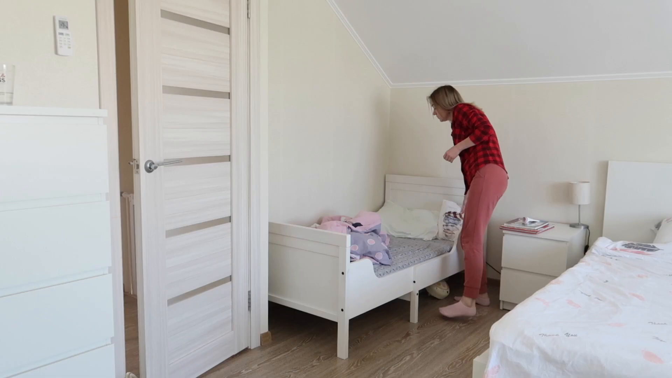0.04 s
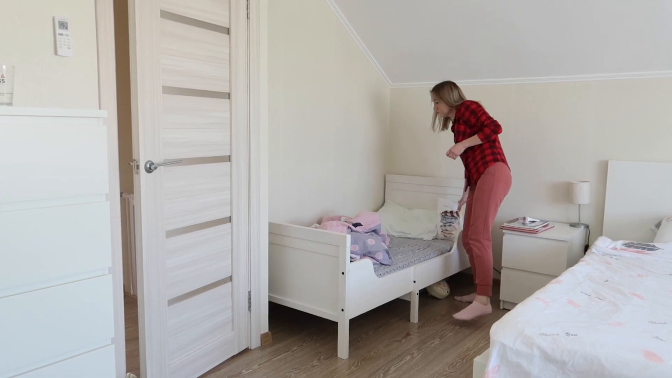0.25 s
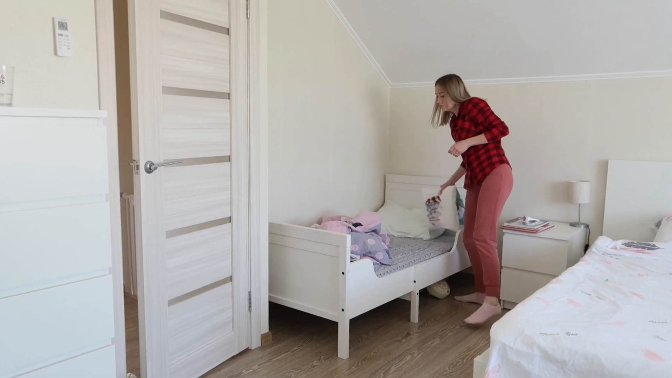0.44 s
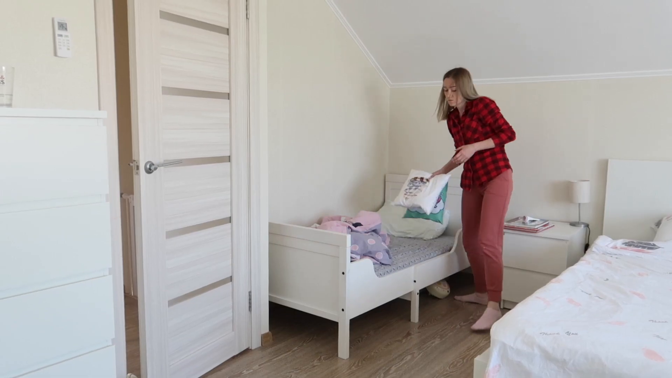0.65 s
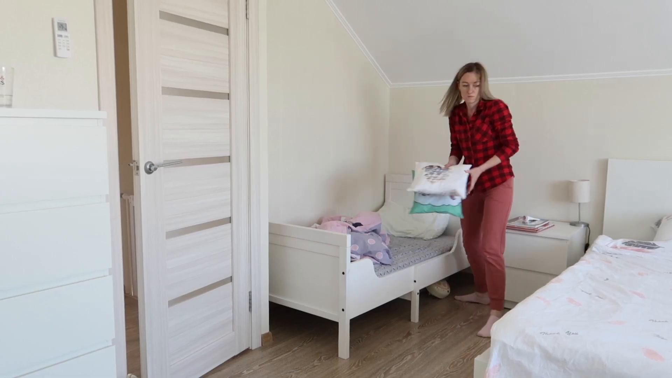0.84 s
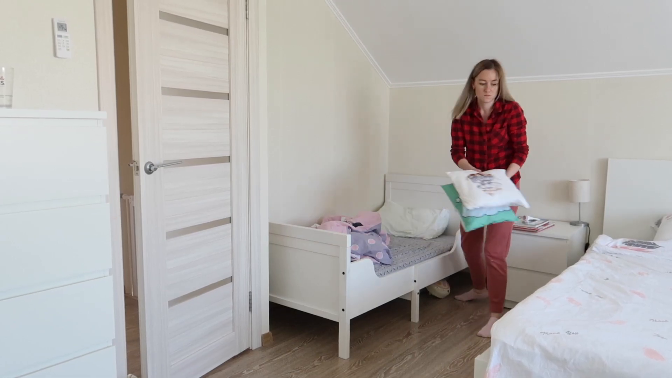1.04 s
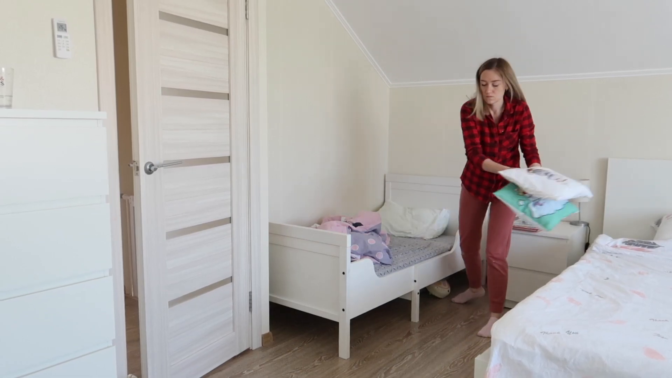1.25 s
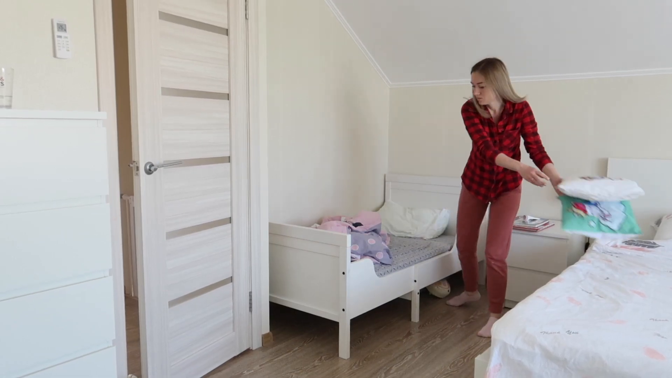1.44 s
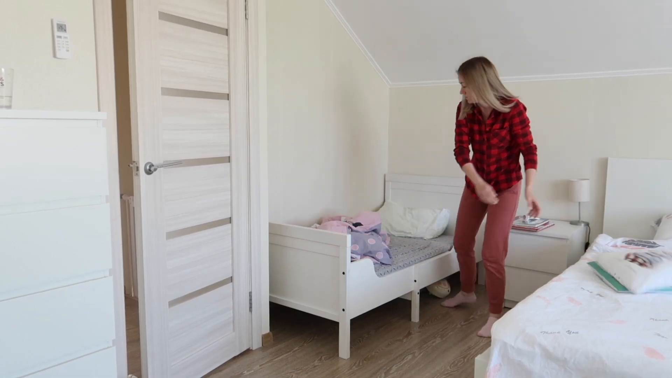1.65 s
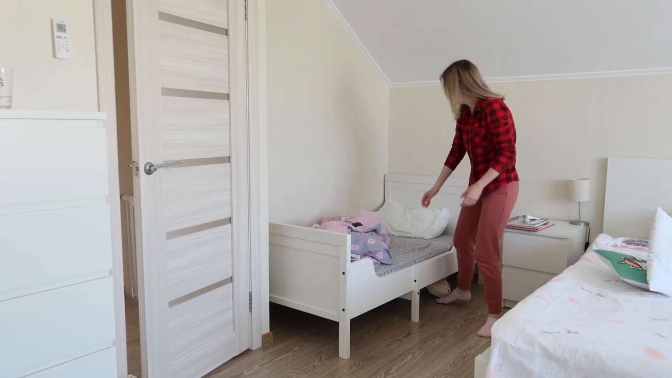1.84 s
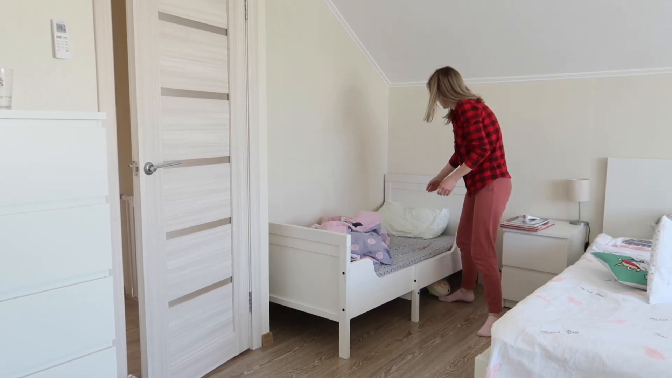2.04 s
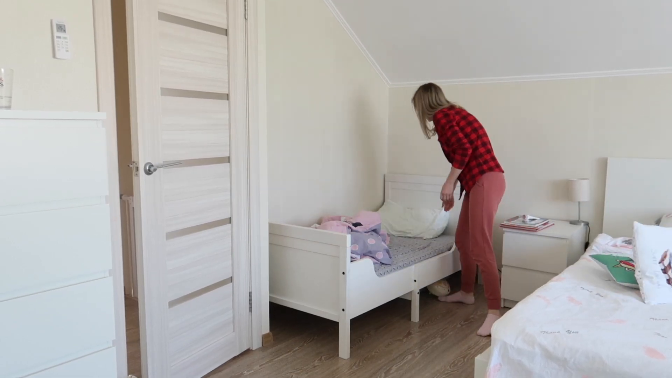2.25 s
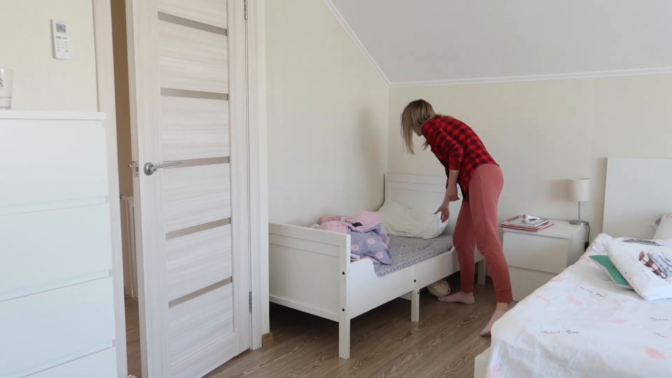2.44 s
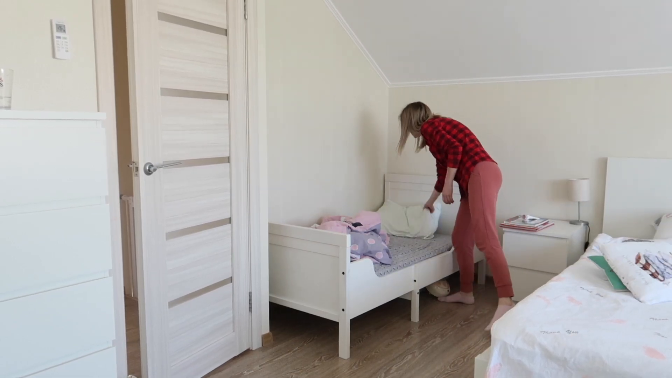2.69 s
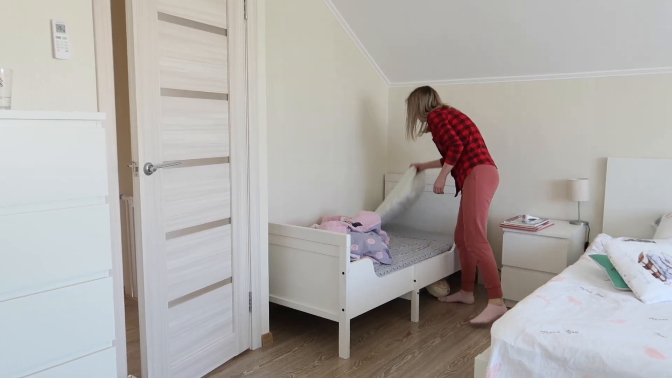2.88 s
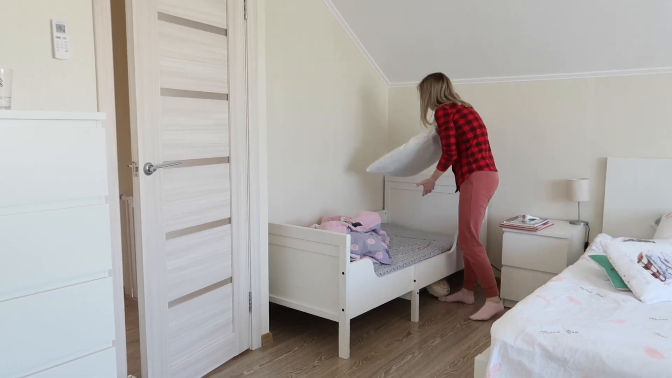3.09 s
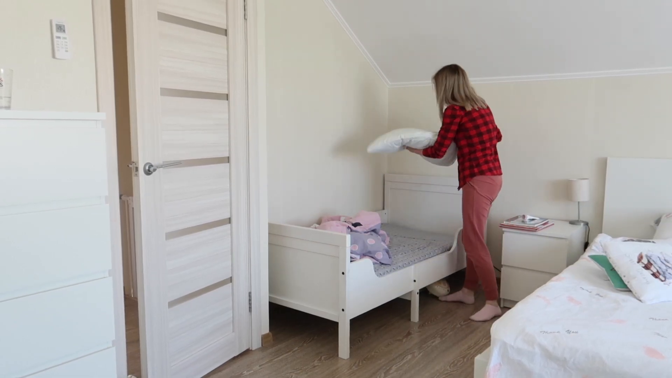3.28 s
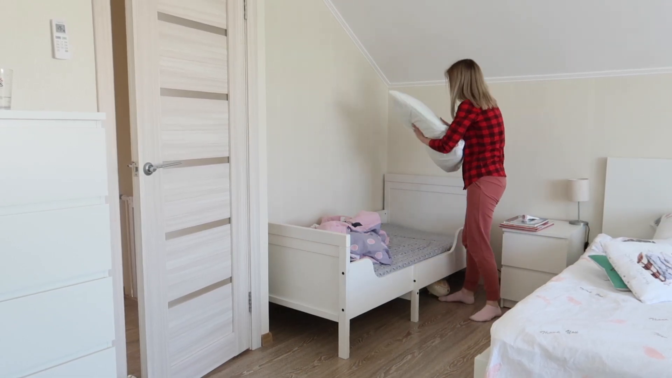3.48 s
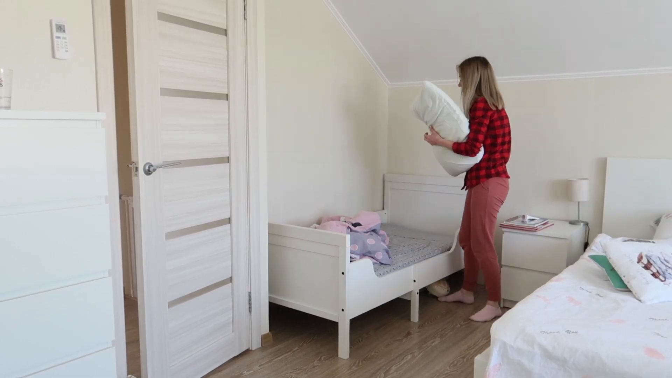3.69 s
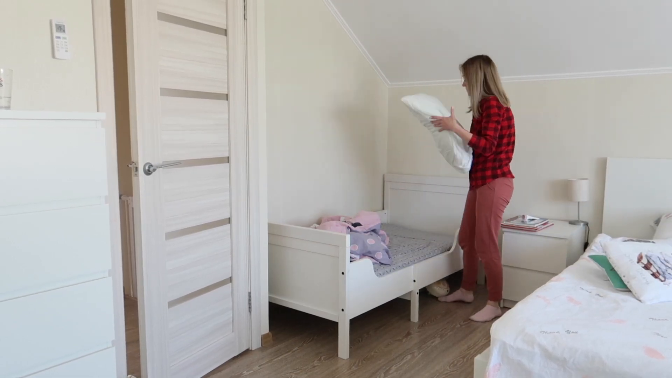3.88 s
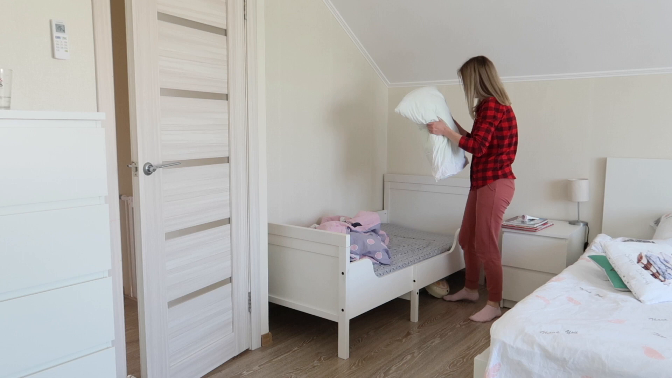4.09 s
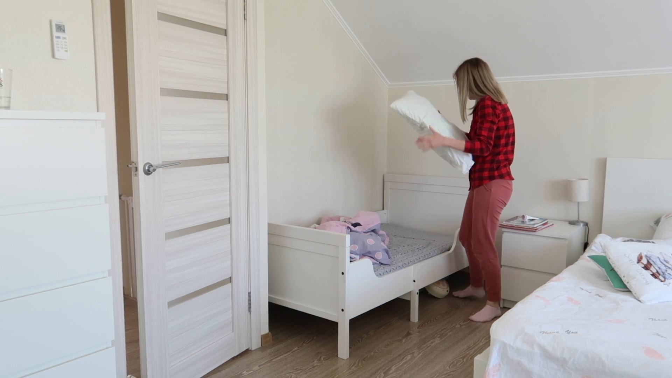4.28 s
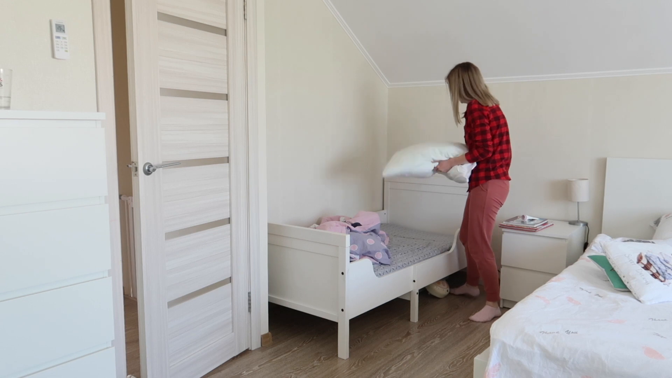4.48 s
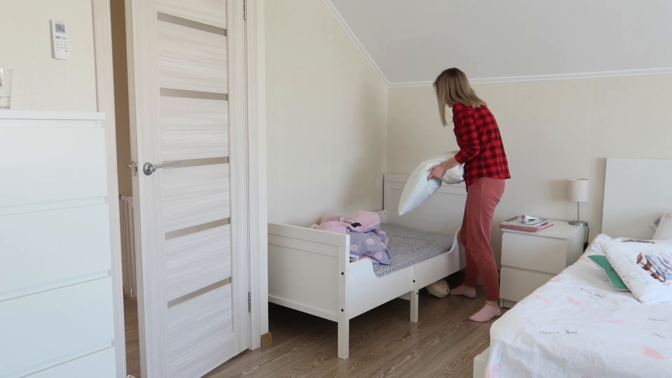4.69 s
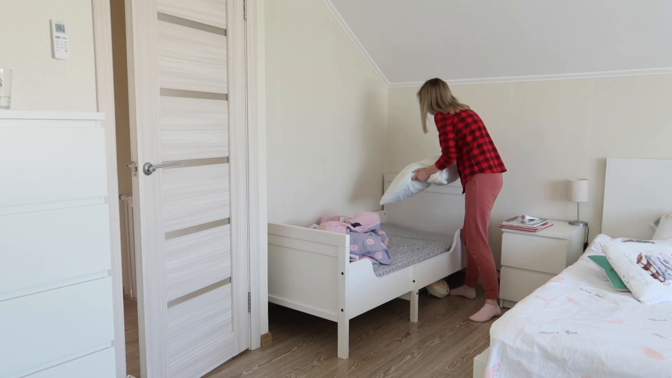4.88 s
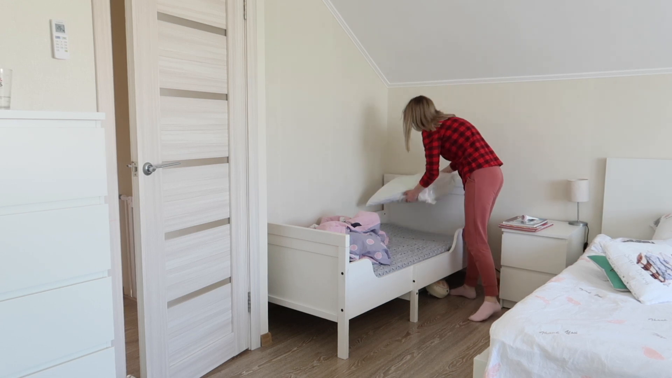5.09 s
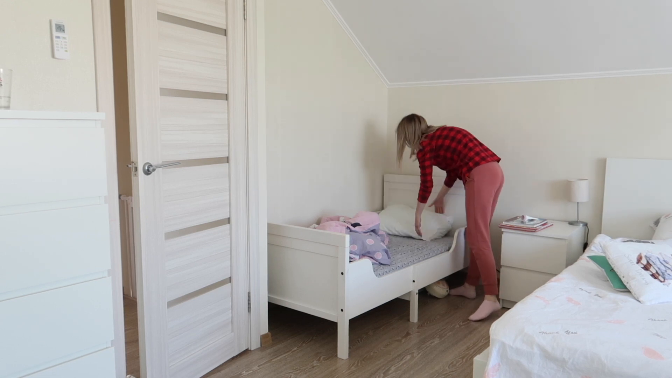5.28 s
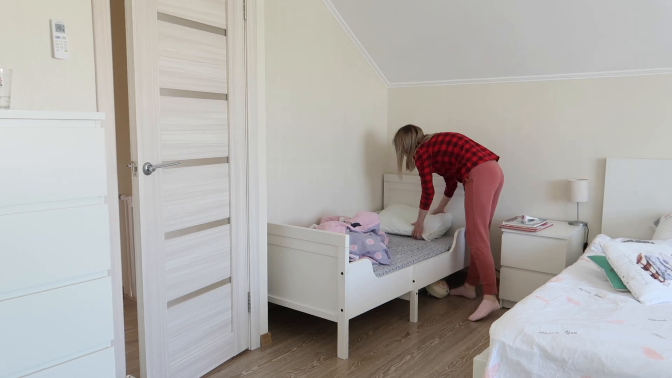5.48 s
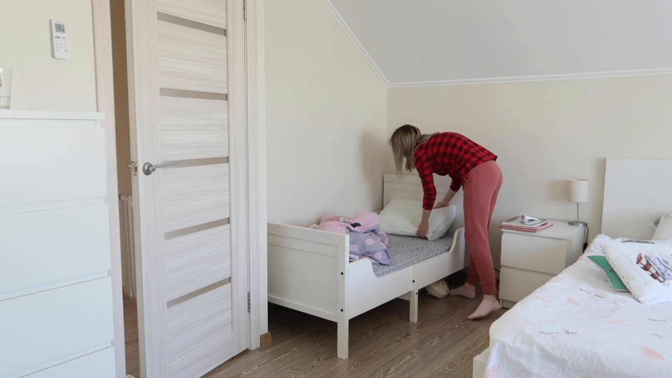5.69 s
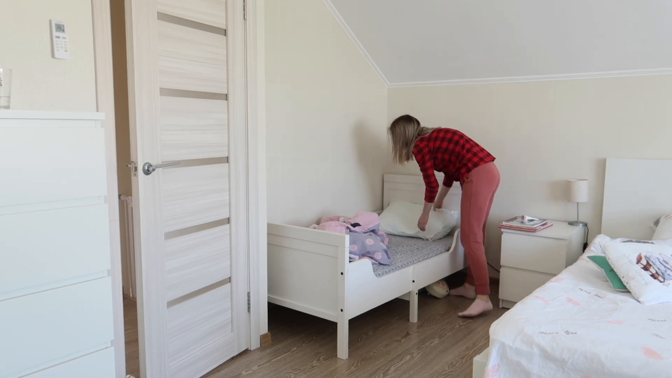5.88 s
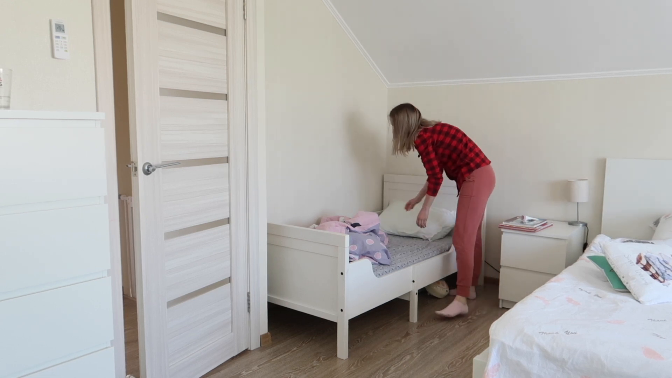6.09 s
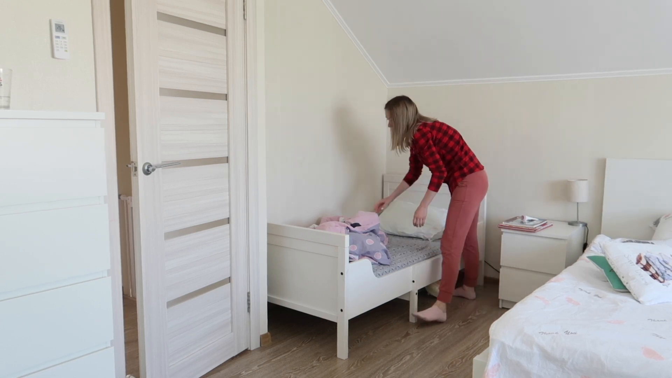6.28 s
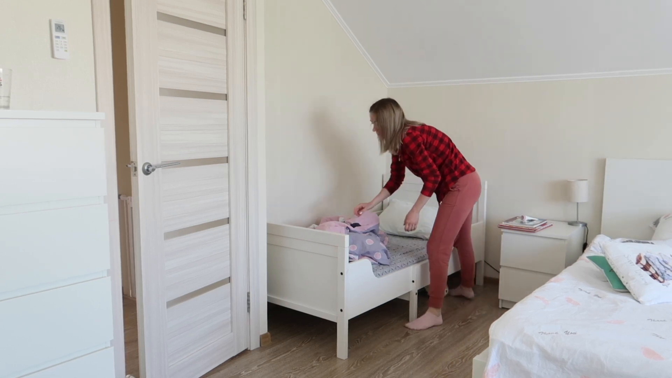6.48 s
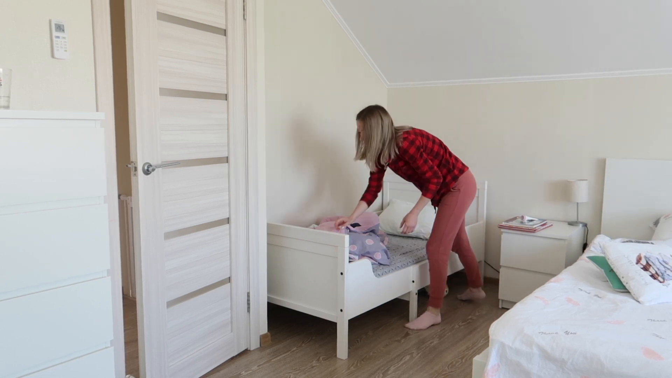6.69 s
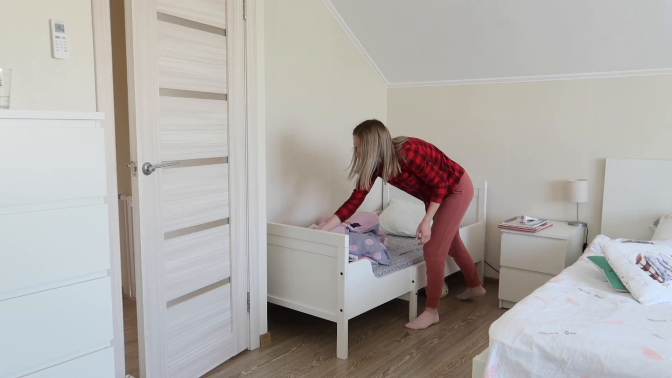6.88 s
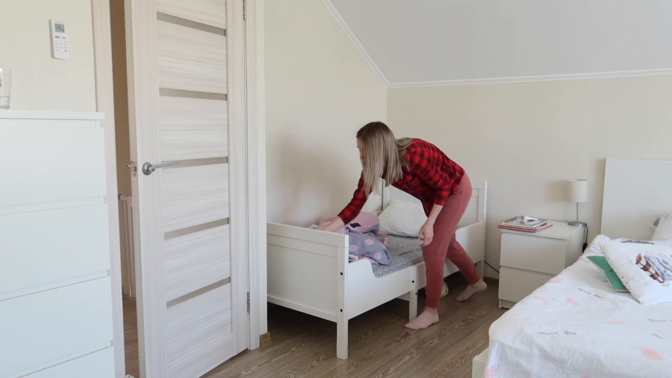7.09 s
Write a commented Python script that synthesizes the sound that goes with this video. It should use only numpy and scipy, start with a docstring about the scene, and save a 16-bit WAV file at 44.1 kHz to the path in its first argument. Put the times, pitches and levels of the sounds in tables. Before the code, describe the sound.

A small, quiet bedroom with steady soft air hush, a barely audible wavering low drone and short natural reverberation, heard from a few metres away. From 0 to 0.6 s a hand sweeps briskly over a duvet, a bright swish with small pats, cutting off abruptly. Faint sleeve and cushion rustles and soft barefoot steps follow around 0.7-1.5 s. At 1.65-1.75 s cushions flop onto a bed with clustered padded thumps and hollow knocks. It is nearly still until a pillow is grabbed at 2.7 s with a dry rustle and pat. Firm dull slaps come at 3.25 and 3.6 s, with rubbing between and after; another pat and rustle at 4.45 s. At 5.25-5.35 s the pillow drops, with bright ticks, a brief wooden frame clap and the deepest, loudest thud. Smoothing rustles fade by 6 s. Bare footsteps thump softly at 6.4-6.65 s, with light cloth rubbing to 7 s.

```python
"""Small, quiet bedroom: someone makes up beds under steady air hush and a faint wavering drone.
A duvet is smoothed, cushions are tossed onto a bed, a pillow is picked up, patted and dropped in place.
Cloth is shaped friction noise; pats and ticks are band-shaped bursts; frame claps are ringing panels.
Thuds, knocks and bare feet are damped modes. Reflections, resonances and a diffuse field make the room."""
import sys
import numpy as np
from scipy import signal
from scipy.fft import rfft, irfft, next_fast_len
from scipy.io import wavfile
from scipy.ndimage import uniform_filter1d

SR = 44100
rng = np.random.default_rng(int(sys.argv[2]) if len(sys.argv) > 2 else 0)


def put_to_file(sound):
    """Save the sound as 16-bit audio at rate SR, in the file named by the first command-line argument."""
    columns = np.atleast_2d(sound).T  # one column per channel
    safe = np.clip(columns, -1, 1)
    whole_steps = np.round(safe * 32767)
    wavfile.write(sys.argv[1], SR, whole_steps.astype(np.int16))


N = 314962
TIME_S = np.arange(N) / SR
BANDS_HZ = 44 * 2. ** (np.arange(18) / 2)  # half-octave centres

# Levels are relative, ahead of the mix gains in scene().
# still room spectrum: hz, level_db
AIR_COLOUR = [(12, -39), (20, -10), (41, 1), (72, -11.5), (108, 0), (174, -9.5), (263, -15), (377, -11),
              (540, -16), (796, -16), (889, -19), (1240, -20.5), (1990, -23), (9370, -38), (15000, -48.5)]
# stereo spread of the hush: hz, side_minus_mid_db
AIR_WIDTH = [(60, -22), (110, -24), (200, -0.5), (380, -0.5), (1300, -0.5), (4400, 2), (15000, 0.5)]
# faint drone in the house: hz, level_db
HUM = [(102, -68), (199, -65), (264, -65), (888, -71)]
AIR_DB = -53

# hand sweeping over the duvet: time_s, speed_db
SWEEP_SPEED = [(0.0, -10), (0.06, -16), (0.1, -7), (0.25, 0), (0.485, -1), (0.52, -10), (0.6, -55)]
# sweep, through the padding: hz, density_db_per_hz
SWEEP_RUB = [(50, -33), (90, 3), (140, 3.5), (250, -3), (370, -13.5), (520, -4), (800, -14), (1300, -6.5),
             (2400, -15.5), (3600, -12.5), (6000, -54)]
# sweep, off the weave: hz, density_db_per_hz
SWEEP_HISS = [(1180, -31), (2000, -12), (2410, -1), (2800, -12), (5140, -2.5), (7260, -7.5), (12000, -21),
              (15000, -58)]
SWEEP_RUB_DB, SWEEP_HISS_DB = -42, -43.5  # at full speed
RUB_SPEED_EXPONENT = 0.17  # hiss: 1

# pillow or sleeve sliding over cloth: start_s, length_s, fastest_at_share_of_length, rub_db, hiss_db
STROKES = [ (0.656, 0.31, 0.4, -60, -68), (0.882, 0.084, .5, -51.5, -55), (0.959, 0.14, 0.34, -49, -55.5),
           (1.072, 0.36, 0.37, -54.5, -61.5), (1.323, 0.22, 0.53, -49, -53),
           (2.164, 0.74, 0.19, -57.5, -74), (2.647, 0.16, .42, -42.5, -50.5),
           (2.78, 0.12, 0.46, -44.5, -51), (2.871, 0.19, 0.15, -47.5, -57), (3.155, 0.39, 0.23, -48, -57.5),
           (3.694, 0.23, 0.15, -47, -61.5), (3.865, 0.37, 0.16, -47.5, -62.5),
           (4.194, 0.18, 0.26, -46.5, -56.5), (4.42, 0.079, 0.48, -39, -55), (4.524, 0.15, 0.52, -44, -55),
           (5.17, 0.36, 0.34, -45, -51), (5.499, 0.25, 0.24, -43.5, -60), (5.72, 0.27, 0.26, -61, -57),
           (6.526, 0.1, 0.41, -55, -64), (6.607, 0.19, 0.44, -50, -56), (6.964, 0.062, .25, -48.5, -64), ]
# handling, through the padding: hz, density_db_per_hz
HANDLING_RUB = [(60, 11), (130, 10.5), (260, 11), (450, 3.5), (800, 1.5), (1400, -3), (2400, -15),
                (4000, -60)]
# handling, off the weave: hz, density_db_per_hz
HANDLING_HISS = [(1200, -6.5), (2600, 0), (5000, -5), (7000, -12.5), (10000, -20), (15000, -38)]
CLOTHES_RUB_DB, CLOTHES_HISS_DB = -73, -63
CLOTHES_SWING_DB, CLOTHES_PER_S = 0.5, 0.36  # rms swing, drift rate
STROKE_EXPONENT = 1.28  # shapes the ease in and out of strokes and scrapes

# soft blows on pillows and bedding: start_s, level_db, peak_s, dull_above_hz, hollow_ring_hz
PATS = [ (0.000, -33, 0.0029, 607, 337), (0.117, -37.5, 0.015, 2000, 520), (0.275, -36, 0.016, 1127, 176),
        (0.511, -37.5, 0.0071, 1496, 666), (0.842, -36.5, 0.011, 302, 204),
        (1.6373, -31, 0.0064, 900, 1000), (1.654, -28, 0.016, 960, 435), (1.685, -23.5, 0.021, 770, 467),
        (1.761, -33, 0.0079, 500, 260), (2.7183, -25.5, 0.0035, 858, 1227), (2.925, -40, 0.006, 261, 160),
        (3.2427, -15, 0.0067, 1150, 645), (3.606, -19, 0.0082, 2050, 636), (3.917, -36.5, 0.0066, 610, 267),
        (4.009, -45, 0.028, 850, 294), (4.455, -30, 0.016, 1620, 445), (5.292, -42.5, 0.013, 1515, 400),
        (5.333, -24, 0.0092, 630, 333), (5.573, -41, 0.0091, 1010, 350), (5.836, -40, 0.0093, 590, 235.4),
        (6.424, -43, 0.016, 1500, 607), (6.979, -46, 0.0063, 900, 520), ]
# padding spectrum: hz, density_db_per_hz
PADDING = [(60, 28), (200, 13.5), (450, 7.5), (800, 3.5), (1500, 1.5), (2600, -2.5), (4200, -7),
           (6000, -13), (9000, -25.5), (15000, -36)]
THIN_HZ, PAT_HZ = 230, 1010  # dull above PAT_HZ: thin below THIN_HZ; both scale together
SETTLE_DELAY_S, SETTLE_DB, SETTLE_PEAK_S = 0.017, -6.5, 0.0075  # dB relative to the blow
SETTLE_DULL_HZ, SETTLE_THIN_HZ, SETTLE_RING_HZ = 600, 130, 240

# scrapes of taut cloth and scuffs of feet: start_s, length_s, level_db, lower_hz, upper_hz, width_octaves
SCRAPES = [ (0.000, 0.09, -49, 2550, 3870, 0.4), (0.145, 0.049, -38.5, 1080, 1370, 0.11),
           (0.173, 0.15, -50, 2320, 2470, 0.2), (0.512, 0.031, -47, 670, 1353, 0.48),
           (2.715, 0.067, -54, 785, 1250, 0.18), (4.23, 0.075, -60, 3000, 5200, 0.38),
           (4.437, 0.063, -51, 1390, 2097, 0.5), (5.223, 0.2, -64, 3545, 4870, 0.18),
           (5.74, 0.29, -64, 3550, 5230, 0.24), (6.54, 0.1, -56, 2850, 4020, 0.21),
           (6.628, 0.075, -53, 2700, 3880, 0.37), (6.675, 0.09, -59, 2800, 3800, 0.25),
           (6.964, 0.073, -55.5, 1410, 2160, 0.36), ]
SCRAPE_FASTEST = 0.16  # share of length

# muffled, hollow knocks of bedding, furniture and floor: start_s, level_db, pitch_hz
KNOCKS = [(0.153, -32, 488), (1.638, -30.5, 451), (1.689, -22, 506), (1.693, -25.5, 416),
          (1.712, -24, 204.6), (1.764, -44, 195), (1.817, -42, 405), (2.717, -31.5, 230),
          (2.727, -30.5, 426), (3.256, -33, 244), (3.612, -31, 680), (3.621, -27.5, 260), (3.653, -27, 256),
          (4.469, -31.5, 253), (4.497, -36, 251), (6.458, -41, 179)]
# knock modes: pitch_multiple, level_db, cycles_to_minus_60_db
HOLLOW_MODES = [(1, -0.5, 40), (2.2, -17.5, 110), (2.78, -15.5, 114)]
KNOCK_SWELL_CYCLES = 1.64

# low thuds, weight landing on pillow, mattress or floor: start_s, level_db, pitch_hz, damping_multiple
THUDS = [(0.267, -33.5, 130, 1), (0.847, -43, 131, 1.2), (1.686, -26, 88.4, .7), (1.711, -33, 93.4, 1.2),
         (2.902, -38, 135, 0.81), (2.931, -35.5, 132.6, 0.7), (3.244, -16.5, 94.3, 1.8),
         (3.615, -30, 147, .9), (4.464, -36, 89.5, 0.83), (4.47, -33, 124, 0.67), (5.317, -21.5, 128, 0.78),
         (5.3306, -9.5, 100.4, 2), (5.367, -24, 129, 0.49), (5.515, -32, 127, 1.8),
         (5.644, -34.5, 122, 1.8), (6.421, -23.5, 94, 1.55), (6.456, -34, 92, 0.85)]
# thud modes: pitch_multiple, level_db, cycles_to_minus_60_db (at damping 1)
THUD_MODES = [(.44, -20, 31.5), (1, -1, 12.5), (1.3, -26, 55), (2.5, -24, 54)]
THUD_SWELL_S = 0.0071

# short bright ticks, from creases, a pillow striking wood or a foot coming unstuck:
# start_s, level_db, peak_s, thin_below_hz, dull_above_hz, ring_hz
TICKS = [ (0.514, -43, 0.007, 700, 2400, 1500), (0.584, -45.5, 0.0069, 3560, 11000, 8000),
         (1.645, -40, 0.016, 950, 3170, 2210), (1.685, -35, 0.018, 893, 5000, 2300),
         (2.192, -47, 0.0093, 1210, 4970, 3260), (2.72, -39, 0.003, 1100, 4500, 3400),
         (3.245, -37.5, 0.0057, 1800, 4000, 2610), (3.272, -40, 0.018, 999, 3500, 2400),
         (5.192, -41.5, 0.0086, 1700, 5500, 3100), (5.2375, -30.5, 0.0061, 840, 5200, 4670),
         (5.3331, -24, 0.0033, 1390, 6950, 4550), (5.368, -43, 0.0048, 2500, 8000, 5000),
         (6.41, -34, 0.0079, 3800, 7600, 4100), (6.964, -43.5, 0.0045, 1300, 3250, 2840), ]

# bare feet on the floor: start_s, level_db, boards_pitch_hz, swell_s, softness_db_per_octave
FOOTFALLS = [(0.985, -36.5, 27, 0.013, 24), (1.065, -39.5, 26.8, 0.0092, 19), (2.226, -44, 41.6, 0.016, 15),
             (4.713, -47.5, 49, 0.0097, 14), (6.409, -24.5, 31.8, 0.003, 16),
             (6.491, -28, 34.3, 0.0072, 11), (6.64, -42.5, 44.6, 0.0081, 13)]
# floor modes: pitch_multiple, level_db, cycles_to_minus_60_db
FLOOR_MODES = [(1, 1.5, 11.5), (1.78, 3, 26), (2.97, 0, 39), (5.6, -8, 63)]

# pillow and hands against the bed frame: start_s, level_db, rise_s
CLAPS = [(5.239, -28.5, .006), (5.334, -28.5, 0.0036)]
# bed frame panels: hz, level_db, t60_s
FRAME_PANELS = [(522, 2.5, 0.18), (652, 3, 0.16), (1200, -1, 0.21), (1690, -4, .1), (2210, -1, .09),
                (2490, -3, 0.072), (2840, -3, .12), (3650, -2, 0.11), (4810, 0.5, 0.086)]

# low standing waves stirred by every thud: hz, width_hz, level_db
BOOM = [(37.98, 5.5, -11), (95.6, 8.2, -6), (263, 7.3, -12)]
# room and furniture resonances: hz, width_hz, level_db
RESONANCES = [(194, 7.2, -11), (235, 16, -9), (264, 29, -5.5), (414, 21, -1), (496.5, 10.8, 2),
              (651, 14, -3.5), (700.7, 16, 5), (746, 13, -11), (845, 27, -0.5), (928, 17, -4.5),
              (1120, 16, -23), (1316, 30, -16), (1490, 15, -12), (1976, 41, -12), (2200, 60, -9.5),
              (2620, 110, -16), (3540, 95, -22), (5040, 88, -15), (5290, 90, -12)]
# first reflections off floor, walls and sloping ceiling: delay_s, level_db
REFLECTIONS = [(.0029, -26), (.0067, -20), (0.012, -17.5), (0.016, -20.5), (0.025, -14.5), (0.033, -14),
               (0.0454, -22.5)]
# small things throw back mostly treble: hz, level_db
CLUTTER = [(200, -18), (900, -1.5), (2500, -2), (12000, -3.5)]
# reverberation: hz, t60_s
ROOM_DECAY = [(80, 0.28), (250, 0.43), (600, 0.5), (1500, 0.48), (4000, 0.41), (12000, 0.21)]
# colour of the diffuse side signal: hz, gain_db
SIDE_WIDTH = [(60, -50), (130, -67), (300, -25.5), (1000, -23), (2300, -21), (4400, -11), (8000, -4.5),
              (15000, 1)]
EDGE_HZ = 15100


def amp(db):
    """Decibels to gain."""
    return 10 ** (np.asarray(db) / 20)


def unit(x):
    """Scales to rms 1."""
    return x / np.sqrt(np.mean(x ** 2) + 1e-20)


def read(points, hz):
    """Reads a table on a log-frequency axis."""
    f, value = np.transpose(points)
    return np.interp(np.log(hz + 1), np.log(f + 1), value)


def add(mix, start_s, sound):
    """Mixes a sound in at start_s."""
    part = mix[max(round(start_s * SR), 0):][:len(sound)]
    part += sound[:len(part)]


def colour(x, points):
    """Filters by a (hz, db) table."""
    size = next_fast_len(len(x), True)
    gain = amp(read(points, np.fft.rfftfreq(size, 1 / SR)))
    return irfft(rfft(x, size) * gain, size)[:len(x)]


def wander(per_s):
    """Smooth random drift of rms 1."""
    size = next_fast_len(N, True)
    hz = np.fft.rfftfreq(size, 1 / SR)
    spectrum = rfft(rng.standard_normal(size)) / (1 + (hz / per_s) ** 4)
    return unit(irfft(spectrum, size)[:N])


def band(x, hz, octaves=0.49):
    """Band-pass centred on hz."""
    edges_hz = hz * 2. ** (octaves * np.array([-.5, .5]))
    return signal.sosfilt(signal.butter(2, edges_hz, "bandpass", fs=SR, output="sos"), x)


def pair(mid, side):
    """Left and right from middle and side."""
    return np.array([mid + side, mid - side])


def air():
    """Steady coloured-noise hush; drone tones waver through random quadrature amplitudes."""
    mid, side = (unit(colour(rng.standard_normal(N), AIR_COLOUR)) for _ in range(2))
    hum = np.zeros(N)
    for hz, db in HUM:
        phase = 2 * np.pi * hz * TIME_S
        hum += amp(db) * unit(wander(5.3) * np.cos(phase) + wander(8.7) * np.sin(phase))
    return amp(AIR_DB) * pair(mid, colour(side, AIR_WIDTH)) + hum


def friction(slips_per_s, spread_db, grainy, uneven_db):
    """Countless small slips as noise, with sparse snaps and an uneven level."""
    sign = np.sign(rng.standard_normal(N))
    size = amp(spread_db * np.minimum(rng.exponential(1, N), 4))
    snaps = sign * size * (rng.random(N) < slips_per_s / SR)
    fibres = rng.standard_normal(N)
    return unit((fibres + grainy * unit(snaps)) * amp(uneven_db * wander(23.5)))


def rustle(rub_level, hiss_level, drive, rub_colour, hiss_colour):
    """Friction sounds twice: muffled through the padding, bright off the weave."""
    rub = rub_level * unit(colour(drive, rub_colour))
    hiss = hiss_level * unit(colour(drive, hiss_colour))
    return rub + hiss


def sweep():
    """Hand on the duvet: hiss follows speed more than rub does, so faster is brighter."""
    time_s, speed_db = np.transpose(SWEEP_SPEED)
    speed = amp(np.interp(TIME_S, time_s, speed_db)) * (TIME_S < time_s[-1])
    rub_level = amp(SWEEP_RUB_DB) * speed ** RUB_SPEED_EXPONENT
    hiss_level = amp(SWEEP_HISS_DB) * speed
    drive = friction(slips_per_s=1300, spread_db=3.0, grainy=0.74, uneven_db=1.1)
    return rustle(rub_level, hiss_level, drive, SWEEP_RUB, SWEEP_HISS)


def arch(length_s, fastest):
    """Speed of one stroke, from rest to rest."""
    share = np.arange(0, length_s, 1 / SR) / length_s
    progress = np.interp(share, [0, np.clip(fastest, .05, .95), 1], [0, .5, 1])
    return abs(np.sin(np.pi * progress)) ** STROKE_EXPONENT


def handling():
    """Pillows and sleeves rub cloth, one arch a stroke, over the constant faint stir of clothes."""
    stir = amp(CLOTHES_SWING_DB * wander(CLOTHES_PER_S))
    rub_level, hiss_level = amp(CLOTHES_RUB_DB) * stir, amp(CLOTHES_HISS_DB) * stir
    for start_s, length_s, fastest, rub_db, hiss_db in STROKES:
        speed = arch(length_s, fastest)
        add(rub_level, start_s, amp(rub_db) * speed)
        add(hiss_level, start_s, amp(hiss_db) * speed)
    drive = friction(slips_per_s=1300, spread_db=3.5, grainy=0.69, uneven_db=2.0)
    return rustle(rub_level, hiss_level, drive, HANDLING_RUB, HANDLING_HISS)


def shares(size):
    """Overlapping weights that split a spectrum into half octaves."""
    hz = np.fft.rfftfreq(size, 1 / SR)
    return np.clip(1 - 2 * abs(np.log2((hz + 1) / BANDS_HZ[:, None])), 0, 1)


def puff(peak_s, dull_hz, thin_hz, ring_hz, hollow_db=4.5):
    """Contact over a few milliseconds: a noise burst shaped in half octaves, with a hollow ring."""
    t = np.arange(6000) / SR
    contact = (t / peak_s * np.exp(1 - t / peak_s)) ** 2
    hollow = hollow_db * np.exp(-(np.log2(BANDS_HZ / ring_hz) / 0.22) ** 2)
    power = BANDS_HZ * amp(read(PADDING, BANDS_HZ) + hollow) ** 2
    power = power / (1 + (BANDS_HZ / dull_hz) ** 2.88) / (1 + (thin_hz / BANDS_HZ) ** 3)
    fibres = irfft(rfft(rng.standard_normal(len(t))) * shares(len(t)), len(t))
    burst = sum(np.sqrt(p) * unit(fibre * contact) for p, fibre in zip(power, fibres))
    return unit(burst) * np.sqrt(np.mean(contact ** 2))


def pats():
    """Each blow slaps the cover, then the filling gives way with a second puff."""
    out = np.zeros(N)
    for start_s, db, peak_s, dull_hz, ring_hz in PATS:
        thin_hz = THIN_HZ * dull_hz / PAT_HZ  # brighter is smaller, with less bass
        slap = puff(peak_s, dull_hz, thin_hz, ring_hz)
        settle = puff(SETTLE_PEAK_S, SETTLE_DULL_HZ, SETTLE_THIN_HZ, SETTLE_RING_HZ)
        add(out, start_s, amp(db) * slap)
        add(out, start_s + SETTLE_DELAY_S, amp(db + SETTLE_DB) * settle)
    return out


def scrapes():
    """Cloth or a foot dragged along chatters in two bands."""
    out = np.zeros(N)
    drive = friction(slips_per_s=300, spread_db=-2.0, grainy=1.7, uneven_db=0.5)
    for start_s, length_s, db, low_hz, high_hz, octaves in SCRAPES:
        speed = arch(length_s, SCRAPE_FASTEST)
        slips = np.roll(drive, -round(start_s * SR))[:len(speed)]
        chatter = unit(band(slips, low_hz, octaves)) + unit(band(slips, high_hz, octaves))
        add(out, start_s, amp(db) * speed * chatter)
    return out


def swing(modes, hz, swell_s, soft_db=0, damping=1):
    """A soft weight sets heavy modes swinging; a softer push spares the upper ones."""
    t = np.arange(SR * 3 // 4) / SR
    out = np.zeros(len(t))
    for multiple, db, cycles in modes:
        turns = hz * multiple * t
        swell = 1 - np.exp(-(t / swell_s) ** 2)
        reach = swell * np.exp(-np.log(1000) * damping * turns / cycles)
        level = amp(db - soft_db * np.log2(multiple))
        out -= level * reach / reach.max() * np.sin(2 * np.pi * turns)
    return out


def knocks():
    """Hollow, muffled knocks from damped modes; a lower knock builds up more slowly."""
    out = np.zeros(N)
    for start_s, db, hz in KNOCKS:
        add(out, start_s, amp(db) * swing(HOLLOW_MODES, hz, KNOCK_SWELL_CYCLES / hz))
    return out


def thuds():
    """Weight landing swings low, damped modes."""
    out = np.zeros(N)
    for start_s, db, hz, damping in THUDS:
        add(out, start_s, amp(db) * swing(THUD_MODES, hz, THUD_SWELL_S, damping=damping))
    return out


def ticks():
    """A short, bright tick: one thin puff with no settling after it."""
    out = np.zeros(N)
    for start_s, db, peak_s, thin_hz, dull_hz, ring_hz in TICKS:
        add(out, start_s, amp(db) * puff(peak_s, dull_hz, thin_hz, ring_hz, hollow_db=6.0))
    return out


def footfalls():
    """Floorboards take the weight of bare feet and swing in low modes."""
    out = np.zeros(N)
    for start_s, db, hz, swell_s, soft_db in FOOTFALLS:
        add(out, start_s, amp(db) * swing(FLOOR_MODES, hz, swell_s, soft_db))
    return out


def claps():
    """A cushioned blow sets the panels of the bed frame ringing briefly."""
    out, t = np.zeros(N), np.arange(SR // 3) / SR
    for start_s, db, rise_s in CLAPS:
        panels = np.zeros(len(t))
        for hz, mode_db, t60_s in FRAME_PANELS:
            panels += amp(mode_db - 60 * t / t60_s) * np.sin(2 * np.pi * (hz * t + rng.random()))
        rise = 1 - np.exp(-(2 * t / rise_s) ** 2)
        add(out, start_s, amp(db) * rise * panels / np.sqrt(len(FRAME_PANELS)))
    return out


def ringing(x, tones, ring_db=0):
    """Adds narrow resonances that ring on."""
    out = x.copy()
    for hz, width_hz, db in tones:
        out += amp(db + ring_db) * signal.lfilter(*signal.iirpeak(hz, hz / width_hz, SR), x)
    return out


def mottle(x, depth_db):
    """Narrow bands swell and sink from moment to moment."""
    z = signal.stft(x, nperseg=512)[2]
    patches = uniform_filter1d(rng.standard_normal(z.shape), size=3, axis=0)
    patches = uniform_filter1d(patches, size=5, axis=1)
    return signal.istft(z * unit(amp(depth_db * unit(patches))), nperseg=512)[1][:N]


def walls(x, clutter_db=-9, clutter_t60_s=0.33, count=48):
    """Near surfaces repeat the sound; furniture scatters many fainter echoes and resonances ring."""
    out, taps = x.copy(), np.zeros(SR // 12)
    for delay_s, db in REFLECTIONS:
        add(out, delay_s, amp(db) * x)
    at = rng.integers(SR // 200, len(taps), count)
    taps[at] = rng.choice([-1, 1], count) * amp(-60 * at / SR / clutter_t60_s)
    echoes = signal.oaconvolve(colour(x, CLUTTER), taps / np.linalg.norm(taps))[:N]
    return ringing(out + amp(clutter_db) * echoes, RESONANCES)


def diffuse(x, patchy_db=2.5, patches_per_s=35, smooth_hz=1800):
    """Two reverberant noise fields: each half octave stores the energy fed to it and leaks it away."""
    out, knots = np.zeros((2, N)), np.arange(1000)
    for hz in BANDS_HZ:
        keep = np.exp(-2 * np.log(1000) / (read(ROOM_DECAY, hz) * SR))
        stored = signal.lfilter([1 - keep], [1, -keep], band(x, hz) ** 2 + 1e-20)
        # close modes beat; in the treble they are too many
        drift = np.interp(TIME_S * patches_per_s, knots, rng.standard_normal(len(knots)))
        beating = amp(patchy_db / (1 + hz / smooth_hz) * drift)
        out += np.sqrt(stored) * beating * unit(band(rng.standard_normal((2, N)), hz))
    return out


def scene(handling_db=-1, direct_db=-4, wet_db=-9.0, thud_wet_db=-13):
    """Mixes the bedroom: cloth through the room, thuds direct with a little reverberation, and air."""
    cloth = sweep() + amp(handling_db) * handling() + pats() + scrapes() + ticks() + claps()
    low = ringing(knocks() + thuds() + footfalls(), BOOM)
    field, across = diffuse(cloth + amp(thud_wet_db) * low)
    direct = amp(direct_db) * walls(mottle(cloth, depth_db=2.5))
    wet = amp(wet_db) * ringing(mottle(field, depth_db=2.0), RESONANCES, ring_db=-5.0)
    # apart from the air, only the diffuse field differs from ear to ear
    return pair(direct + low + wet, colour(across, SIDE_WIDTH)) + air()


def record(dry):
    """Low-passes both channels at EDGE_HZ."""
    taps = signal.firwin(511, EDGE_HZ, window=("kaiser", 9), fs=SR)
    return signal.oaconvolve(dry, taps[None], "same")


dry = scene()
out = record(dry)
put_to_file(out)
```